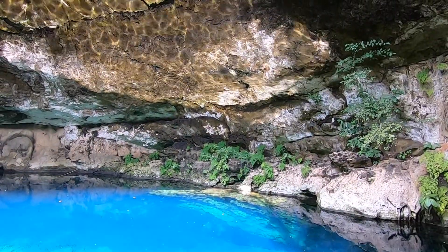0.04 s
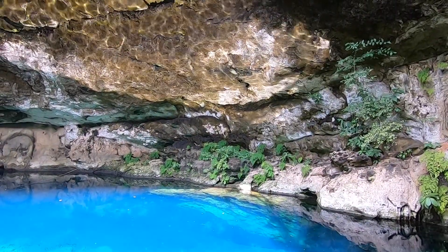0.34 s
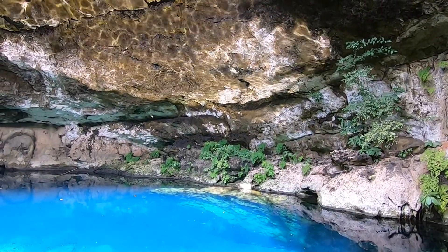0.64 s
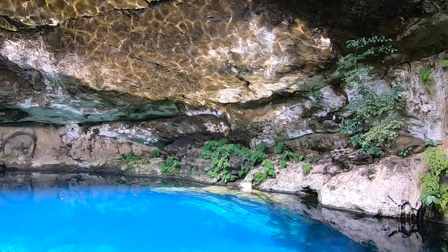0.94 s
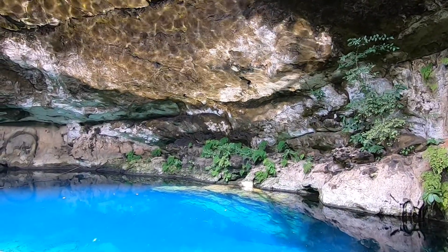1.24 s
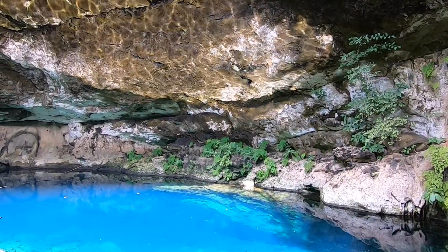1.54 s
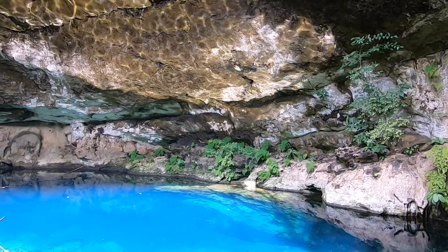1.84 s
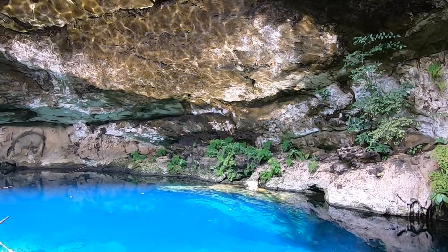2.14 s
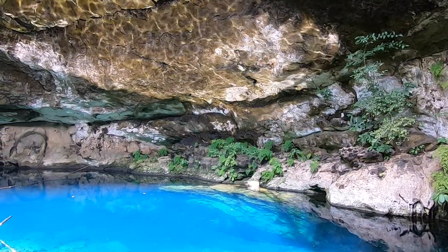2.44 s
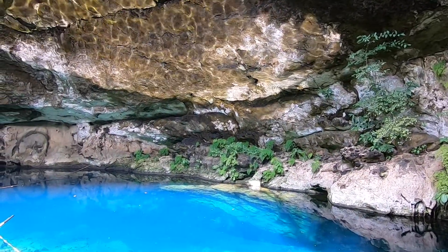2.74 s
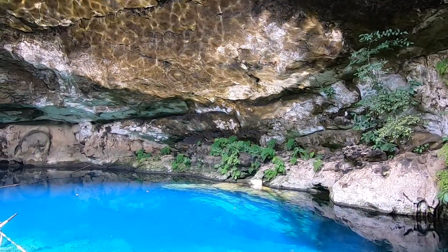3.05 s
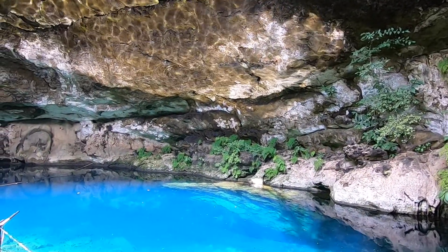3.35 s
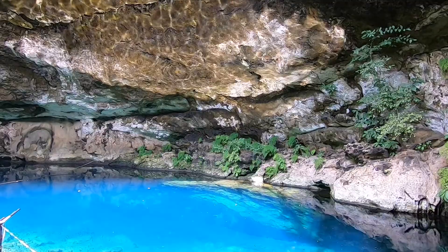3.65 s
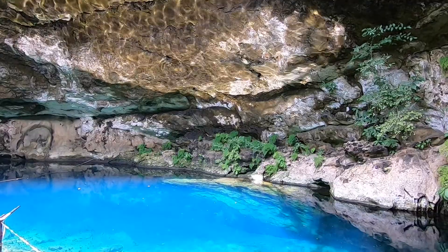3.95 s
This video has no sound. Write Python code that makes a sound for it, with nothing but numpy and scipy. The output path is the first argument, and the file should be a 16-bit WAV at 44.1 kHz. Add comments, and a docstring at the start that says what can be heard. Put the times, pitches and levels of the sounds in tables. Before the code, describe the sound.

Falling water hisses and drips into a rocky pool throughout, the drops echoing slightly. Air puffs on the microphone with a brief rumble, and a small bird chirps early on. Later come a soft microphone bump and a light breeze.

```python
"""Water falls into a pool under a rock overhang: all along, a surging hiss with fine spray and plinking drops.
At the start, air puffs on the microphone and a low rumble throbs, then dies away in the hollow.
During the first two seconds a small bird chirps, echoing off the rock like the drops.
Just before three seconds the microphone takes a soft bump, and after that a breeze rises."""
import sys
import numpy as np
from scipy import signal
from scipy.fft import rfft, irfft
from scipy.io import wavfile

SR = 44100
rng = np.random.default_rng(int(sys.argv[2]) if len(sys.argv) > 2 else 0)


def store_pcm(level_fs):
    """Save levels as 16-bit WAV."""
    pcm = np.round(np.clip(level_fs, -1, 1) * 32767).astype(np.int16)
    wavfile.write(sys.argv[1], SR, np.atleast_2d(pcm).T)


N = 176400


def from_db(db):
    """Turn decibels into a number to multiply by."""
    return 10 ** (np.asarray(db) / 20)


def rms_one(x):
    """Scale a sound so that its average strength (rms) is 1."""
    return x / np.sqrt(np.mean(x ** 2) + 1e-20)


def seconds():
    """The time of every sample."""
    return np.arange(N) / SR


def at_hz(points, hz):
    """Look up a table by frequency, giving every octave equal room."""
    freqs, values = np.transpose(points)
    return np.interp(np.log(hz + 1e-9), np.log(freqs), values)


def pan(db):
    """Left and right gains that make the left side db louder."""
    return from_db(np.array([[.5], [-.5]]) * db)


def swell(when, width):
    """A bell-shaped rise and fall of height 1."""
    return np.exp(-((seconds() - when) / width) ** 2 / 2)


def drift(per_s):
    """A smooth random wander, about 1 in size; a higher rate wanders faster."""
    step, warm_up = 40, 2000
    memory = np.exp(-2 * np.pi * step * per_s / SR)
    white = rng.standard_normal(N // step + warm_up + 2)
    slow = signal.lfilter([1], [1, -2 * memory, memory * memory], white)[warm_up:]
    return np.interp(np.arange(N) / step, np.arange(len(slow)), rms_one(slow))


# how alike the two ears hear a noise: (frequency [Hz], likeness [1 = the same])
EAR_LIKENESS = [(40, 0.31), (140, 0.78), (400, 0.81), (750, 0.43), (1400, 0.25), (2500, 0.43), (3400, 0.72),
                (4300, 0.56), (5200, 0.31), (7600, -0.18), (13000, 0.0043)]
# which way a noise leans: (frequency [Hz], left minus right [dB])
EAR_BALANCE = [(300, 0.4), (850, 1), (1250, -2.4), (2500, -1.4), (4500, 0.1), (6500, -1), (8700, 1.5),
               (10200, 4), (12500, 1.5)]


def coloured(white, colour):
    """Shape two white noises into the left and right spectra of one wide sound."""
    hz = np.arange(N // 2 + 1) * SR / N
    mid, side = rfft(white)
    alike = at_hz(EAR_LIKENESS, hz)
    pair = np.sqrt(1 + alike) * mid + np.sqrt(1 - alike) * side * [[1], [-1]]
    return pair * pan(at_hz(EAR_BALANCE, hz)) * from_db(at_hz(colour, hz)) * np.sqrt(SR) / 2


def bands(spectra, count):
    """Split spectra into overlapping bands, low to high: (centre [Hz], stereo sound)."""
    hz = np.arange(N // 2 + 1) * SR / N
    centres = np.geomspace(100, 13000, count)
    for centre, weights in zip(centres, np.eye(count)):
        yield centre, irfft(spectra * np.interp(hz, centres, weights), N)


def noise(colour):
    """Steady stereo noise with a given mix of lows and highs."""
    return irfft(coloured(rng.standard_normal((2, N)), colour), N)


# puffs of air: (time [s], width [s], level [dB])
PUFFS = [(.07, 0.035, -45), (.28, 0.032, -48.5), (.9, 0.054, -55)]
# their deep sound: (frequency [Hz], relative level [dB])
PUFF_COLOUR = [(25, -25), (60, -15), (115, -2), (170, -10), (400, -41)]


def air_puffs():
    """Air hits the microphone in a few short, low puffs."""
    loudness = sum(from_db(db) * swell(when, width) for when, width, db in PUFFS)
    return loudness * rms_one(noise(PUFF_COLOUR))


# how the breeze rises: (time [s], level change [dB])
BREEZE_RISE = [(0, -25), (3.1, -17.5), (3.3, -3), (3.56, -11.5), (3.64, 1.5), (4, -0.5)]
# its soft sound: (frequency [Hz], level before that change [dB per Hz])
BREEZE_COLOUR = [(30, -87), (95, -96), (160, -77.5), (220, -73), (290, -80), (400, -73), (600, -76),
                 (950, -73), (1400, -78), (2500, -100)]


def breeze():
    """Moving air makes a soft rush that grows near the end."""
    level_db = np.interp(seconds(), *np.transpose(BREEZE_RISE))
    return from_db(level_db) * noise(BREEZE_COLOUR)


# one soft bump and its smaller knocks: (time [s], pitch [Hz], level [dB])
KNOCKS = [(2.804, 245, -34), (2.811, 225, -22.5), (2.822, 229, -31), (2.867, 300, -38.5), (2.899, 320, -39),
          (2.925, 282, -39), (2.937, 224, -41), (2.962, 260, -43)]


def microphone_bump(width_cycles=0.43, push_db=-22, push_s=0.0036):
    """Each touch swings the microphone about once, on top of a slower push."""
    out = 0
    for when, hz, db in KNOCKS:
        t = seconds() - when
        swing = np.exp(-(t * hz / width_cycles) ** 2 / 2) * np.cos(2 * np.pi * hz * t)
        push = -t / push_s * np.exp(-(t / push_s) ** 2 / 2)
        out = out + from_db(db) * (swing + from_db(push_db) * push)
    return out


def wavering(hz, depth=0.57, per_s=6.1):
    """A tone that wobbles in strength and slightly in pitch."""
    sway = 1 + depth * (drift(per_s) + 1j * drift(per_s))
    return np.imag(sway * np.exp(2j * np.pi * hz * seconds()))


# the hollow's own notes: (pitch [Hz], starting level [dB], time to fade by 60 dB [s])
HOLLOW_NOTES = [(157.5, -51, 3.9), (249.4, -50, 1.8), (436, -50.5, 2.1), (641, -52, 0.86)]
# faint tones that come and go: (time [s], width [s], pitch [Hz], level [dB])
FAINT_TONES = [(.82, 0.12, 494, -59), (.88, 0.13, 730, -60), (1.8, 0.22, 485, -63), (3.2, .12, 486, -57.5)]


def hollow():
    """The hollow rings on after the boom; later a few faint tones swell and fade."""
    ringing = sum(from_db(db - 60 * seconds() / fade_s) * wavering(hz) for hz, db, fade_s in HOLLOW_NOTES)
    tones = sum(from_db(db) * swell(when, width) * wavering(hz) for when, width, hz, db in FAINT_TONES)
    return ringing + tones


# the low boom: (frequency [Hz], starting level [dB per Hz])
RUMBLE_COLOUR = [(30, -85), (85, -91), (135, -71), (200, -72), (260, -68.5), (310, -67), (385, -69.5),
                 (435, -67.5), (490, -72.5), (650, -69.5), (900, -78.5), (1400, -100)]


def rumble(hold_s=0.059):
    """A low boom dies away in the hollow, its higher notes fading first."""
    fading_s = np.maximum(seconds() - hold_s, 0)
    out = 0
    for hz, band in bands(coloured(rng.standard_normal((2, N)), RUMBLE_COLOUR), count=10):
        fall_db_per_s = 17 * (hz / 150) ** 0.49
        out = out + band * from_db(-fall_db_per_s * fading_s)
    return out


# the beats of the rumble: (time [s], width [s], pitch [Hz], level [dB])
RUMBLE_THROBS = [(0.031, 0.029, 144, -37), (.083, .02, 248, -40.5), (.085, 0.013, 440, -41),
                 (.17, 0.0093, 427, -42), (.19, 0.017, 157, -38), (.2, 0.029, 246.5, -42),
                 (.254, 0.0089, 149, -38), (.296, .011, 145, -39), (.362, 0.013, 158, -44),
                 (.53, .025, 157, -48.5), (.63, 0.0098, 162, -42), (.77, 0.022, 237, -50),
                 (.83, .015, 228, -50.5), (1.08, 0.013, 165, -52), (1.14, 0.014, 278, -46.5),
                 (1.44, 0.021, 250, -49.5)]


def throbs(sag_per_s=0.95):
    """Short swells near the hollow's own notes, each sinking in pitch."""
    out = 0
    for when, width, hz, db in RUMBLE_THROBS:
        t = seconds() - when
        cycles = hz * (t - sag_per_s * t * t / 2) + rng.random()
        out = out + from_db(db) * swell(when, width) * np.sin(2 * np.pi * cycles)
    return out


def rock_echo(sound, fade_s=1):
    """Sound bounces off the overhang many times and fades, differently at each ear."""
    t = np.arange(SR) / SR
    tail = rng.standard_normal((2, SR)) * from_db(-60 * t / fade_s)
    tail /= np.sqrt(np.sum(tail ** 2, axis=1, keepdims=True))
    return signal.fftconvolve(sound, tail, axes=1)[:, :N]


# the bird's calls: (time [s], pitch [Hz], width [s], level [dB],
# overtone compared with the main tone [dB], slide [share of pitch per s])
BIRD_CHIRPS = [(.094, 3340, 0.0083, -26, -6, .5), (.15, 3410, .03, -41, -7, 0.076),
               (.862, 3310, .014, -31, -15, 0), (.915, 3320, 0.0193, -42, -20, 0),
               (1.46, 3290, 0.027, -40, -17, 0), (1.509, 3235, 0.0121, -33.5, -22, 0),
               (1.8, 3370, 0.011, -28.5, -31, .9), (1.84, 3475, .024, -32, -27, .3),
               (1.915, 3446, .035, -35, -27, -.1)]


def bird(arch=0.0073, roughness=0.01505, pan_db=-4.5):
    """Each short, slightly harsh chirp is a tone and its octave on an arching, shaky pitch."""
    out = 0
    for when, hz, width, db, overtone_db, slide in BIRD_CHIRPS:
        offset = np.clip((seconds() - when) / width, -10, 10)   # widths from the chirp's middle
        bend = slide * offset * width - arch * offset ** 2 / 2
        pitch = hz * (1 + bend + roughness * drift(per_s=327))
        phase = 2 * np.pi * np.cumsum(pitch) / SR
        tone = np.sin(phase) + from_db(overtone_db) * np.sin(2 * phase)
        out = out + from_db(db) * swell(when, width) * tone
    return pan(pan_db) * out


# single drops landing in the pool: (time [s], pitch [Hz], level [dB], left minus right [dB],
# time to fade by 60 dB [s], slide [share of pitch per s])
POOL_DROPS = [(.178, 1198, -38.5, -15, .06, 0.5), (.326, 2422, -32.5, -7, .08, -0.8),
              (.471, 1320, -34.5, -13, .08, 1), (.484, 1195, -40, -11, .06, -2.5),
              (.623, 6230, -40, -8, .06, -0.5), (.785, 2540, -32, -3, .08, 0.5),
              (.897, 1625, -39, -6, .06, 0), (1.067, 4030, -33, 2, .07, -2.5),
              (1.079, 2014, -31, -1, .06, -2), (1.112, 1365, -38, -4, 0.083, 0),
              (1.156, 1342, -33, -10, .07, -2.5), (1.329, 5930, -34, -2, 0.098, 0),
              (1.593, 3060, -32, -15, 0.072, -1), (2.064, 1393, -40, -6, .07, 0),
              (2.28, 1365, -31.5, -8, .13, -0.7), (2.696, 1550, -41, -15, .07, -2.5),
              (2.861, 1464, -40, -12, 0.078, -0.5), (3.379, 1065, -42, -4, .07, 2),
              (3.389, 2106, -39, -12, .07, -1), (3.494, 5560, -36, -7, .07, 0),
              (3.69, 2460, -36, -10, .07, -1), (3.738, 1580, -39.5, -9, 0.049, 2),
              (3.771, 958, -41, 4, 0.063, 3)]
DROP_RISE_S = 0.0054


def drops(roughness=0.02):
    """Each drop traps a bubble that rings briefly on a sliding, shaky pitch."""
    t = np.arange(SR // 4) / SR
    out = np.zeros((2, N + SR))
    shake = roughness * drift(per_s=150)
    for when, hz, db, pan_db, fade_s, slide in POOL_DROPS:
        start = int(when * SR)
        loudness = np.minimum(t / DROP_RISE_S, from_db(-60 * (t - DROP_RISE_S) / fade_s))
        pitch = hz * (1 + slide * t + np.roll(shake, -start)[:len(t)])
        tone = np.sin(2 * np.pi * np.cumsum(pitch) / SR)
        out[:, start:start + len(t)] += from_db(db) * pan(pan_db) * loudness * tone
    return out[:, :N]


# the sound of the water, for both drips and hiss: (frequency [Hz], relative level [dB])
WATER_COLOUR = [(30, -88.5), (100, -100.5), (150, -78.5), (260, -77.5), (340, -84), (430, -82),
                (560, -83.5), (950, -80), (1150, -70), (1370, -67.5), (1600, -72), (2100, -70),
                (2700, -66.5), (3050, -66.5), (3350, -64), (4000, -65.5), (4700, -69), (5800, -71),
                (7000, -77.5), (8100, -80), (8900, -86.5), (10100, -83.5), (12000, -91.5), (14000, -99.9)]


def drips(per_s=85, level_db=-44.5, fade_s=0.17, low_hz=1603.6, high_hz=6378, rise_per_s=0.28):
    """Many tiny drips ring inside the hiss, each at a random time and on a slightly rising pitch."""
    t = np.arange(SR // 4) / SR
    out = np.zeros((2, N + SR))
    loudness = (1 - np.exp(-t / DROP_RISE_S)) * from_db(-60 * t / fade_s)
    for when, highness, smallness, side in rng.random((1000, 4))[:int(per_s * N / SR)]:
        start = int(when * N)
        hz = low_hz + highness * (high_hz - low_hz)
        size_db = -np.log(smallness + .05)
        gain = from_db(at_hz(WATER_COLOUR, hz) + size_db) * pan(12 * (side - .5))
        tone = np.sin(2 * np.pi * hz * (t + rise_per_s * t * t / 2))
        out[:, start:start + len(t)] += gain * loudness * tone
    return from_db(level_db) * rms_one(out[:, :N])


def splashes(per_s=5000, spread_db=2.5, power_share=0.22):
    """Countless splashes: tiny clicks of random size, mixed with smooth noise."""
    hits = rng.random((2, N)) < per_s / SR
    sizes = from_db(spread_db * np.minimum(rng.exponential(1, (2, N)), 5))
    clicks = rms_one(hits * sizes * rng.choice([-1, 1], (2, N)))
    return np.sqrt(power_share) * clicks + np.sqrt(1 - power_share) * rng.standard_normal((2, N))


# how the bright part of the hiss rises and falls:
# (time [s], low-middle [dB], middle [dB], upper-middle [dB], treble [dB])
HISS_SURGES = [(0, 0.5, 2.5, -2, -8), (.13, 0.5, 2, -2, -1), (.32, 0, 1.3, -3.5, -7),
               (.7, 0.5, 0.7, -1.5, -2), (.77, -0.8, -2.2, 0.2, -3), (.93, -0.9, 0, -2.5, -1.5),
               (1.27, -0.5, -0.6, -1.5, 3), (1.38, -1, -1.5, 0, 1), (1.6, -0.5, 1, 2.5, 2.5),
               (1.87, -0.5, 2.5, 3.5, -0.5), (2.03, 0.5, 0.5, 2.5, -1), (2.13, 0.5, 0.8, 2.5, 2.5),
               (2.5, -1, 0.7, 1, -1.5), (2.76, -1.5, -1.3, -3, -3.5), (2.87, 1, 1.5, -0.8, -4),
               (3.12, 0.5, -0.4, -2, -1.8), (3.3, 1.6, 0.8, 0.5, 5), (3.54, 1.1, -3.5, -2.5, -1.5),
               (3.66, -0.3, 1, 0.3, 5), (3.77, -0.5, -2, 0, 2.5), (3.86, -0.5, 3.5, 0.5, 4.5),
               (4, 2, 2, 1.5, 2.5)]
# where those four bands sit: (centre [Hz])
SURGE_CENTRES = [1780, 3750, 5600, 8060]
# how the dull part of the hiss rises and falls: (time [s], level change [dB])
HISS_BODY = [(0, 0), (.55, -1.5), (.85, -0.5), (1.1, -2.5), (1.3, 0.5), (1.7, 1), (2.0, 0), (2.2, 3),
             (2.65, 0.5), (2.95, 2), (3.13, -5), (3.3, 0.5), (4, -0.5)]
# heavier gushes that briefly lift the whole hiss: (time [s], width [s], lift [dB])
WATER_GUSHES = [(.77, 0.018, 2.5), (.86, 0.013, 1), (1.0, 0.021, 1.2), (1.29, 0.036, 1), (2.33, .05, 1.5)]


def falling_water(level_db=-0.82, bright_above_hz=900, body_low_hz=340, body_high_hz=950):
    """Splashes blend into a hiss that surges slowly and flutters, as a whole and band by band."""
    t, surges = seconds(), np.array(HISS_SURGES)
    hiss = coloured(splashes(), WATER_COLOUR)
    flutter_db = 0.55 * drift(per_s=14.4)
    gush_db = sum(db * swell(when, width) for when, width, db in WATER_GUSHES)
    out = 0
    for hz, band in bands(hiss, count=24):
        levels = [np.interp(np.log(hz), np.log(SURGE_CENTRES), row[1:]) for row in surges]
        surge_db = np.interp(t, surges[:, 0], levels) * (hz > bright_above_hz)
        body_db = np.interp(t, *np.transpose(HISS_BODY)) * (body_low_hz < hz < body_high_hz)
        band_flutter_db = 0.92 * drift(per_s=11.2)
        out = out + band * from_db(level_db + surge_db + body_db + gush_db + flutter_db + band_flutter_db)
    return out


def scene():
    """Add everything up; only the drops, the drips and the bird get an echo."""
    plinks, patter, chirps = drops(), drips(), bird()
    echo = rock_echo(from_db(-1.5) * plinks + from_db(-4.5) * patter + from_db(-3) * chirps)
    water = falling_water() + plinks + patter
    boom = rumble() + throbs() + hollow()
    return water + chirps + echo + boom + air_puffs() + breeze() + microphone_bump()


def record(dry, cutoff_hz=14300):
    """A steep filter takes away the very highest sounds."""
    return signal.sosfilt(signal.ellip(10, .1, 80, cutoff_hz, fs=SR, output="sos"), dry)


dry = scene()
out = record(dry)
store_pcm(out)
```